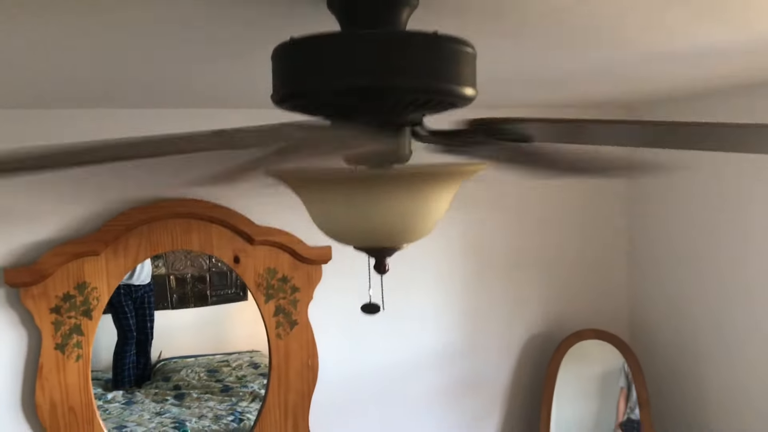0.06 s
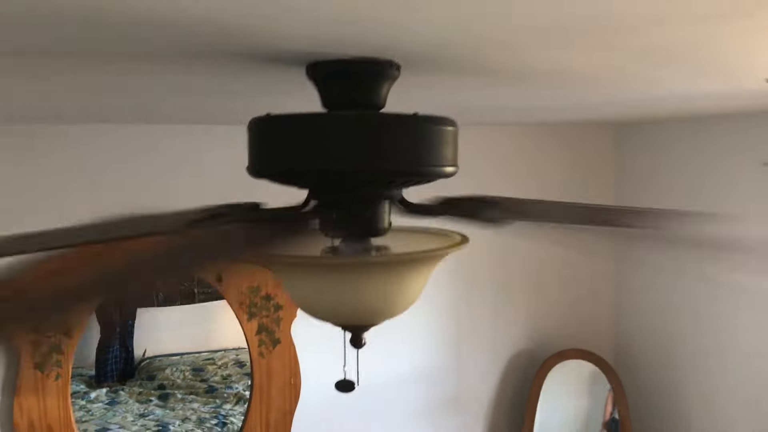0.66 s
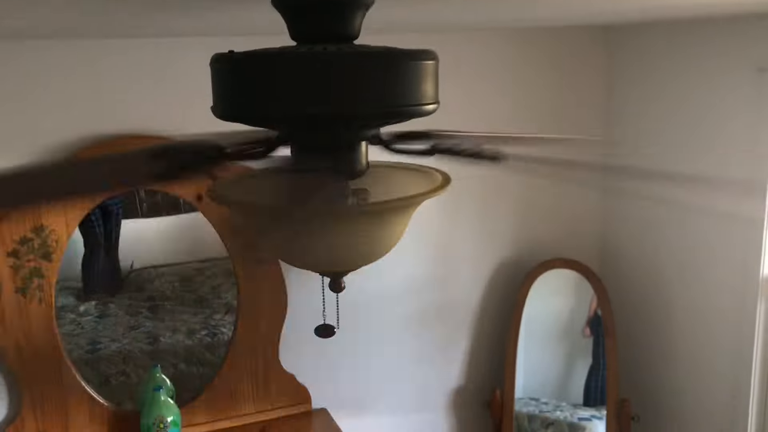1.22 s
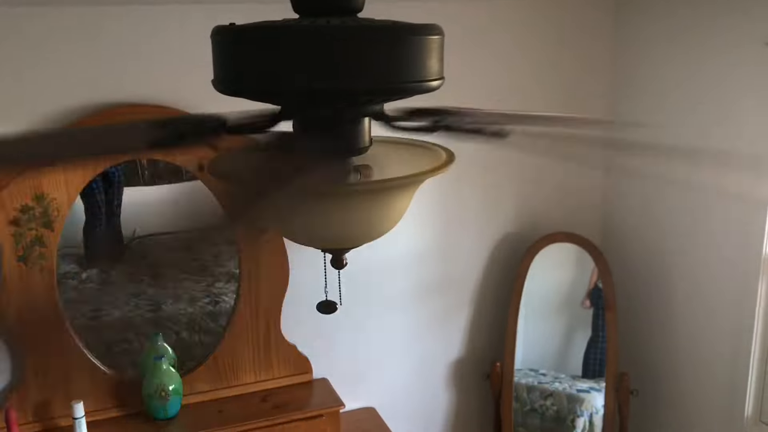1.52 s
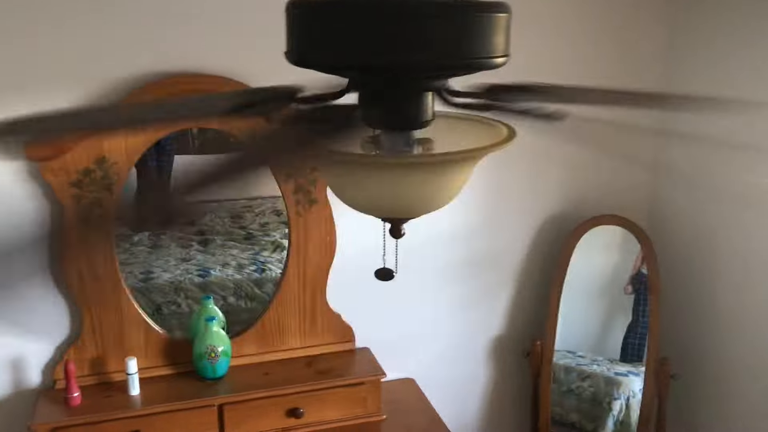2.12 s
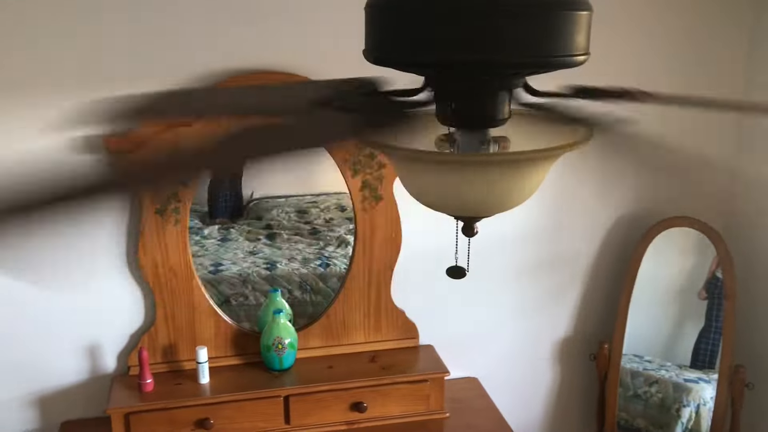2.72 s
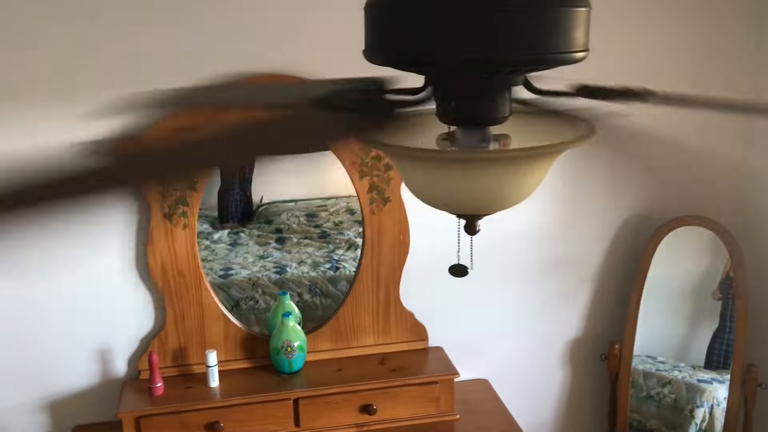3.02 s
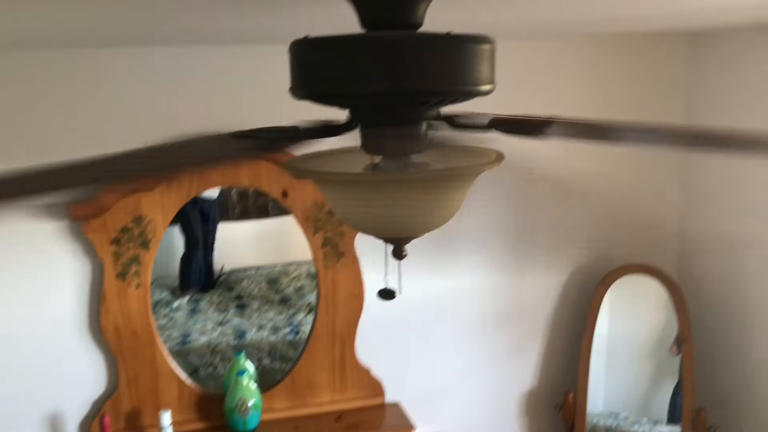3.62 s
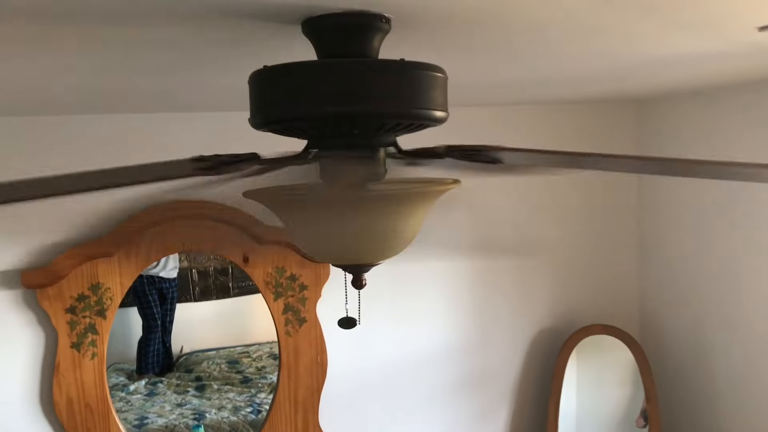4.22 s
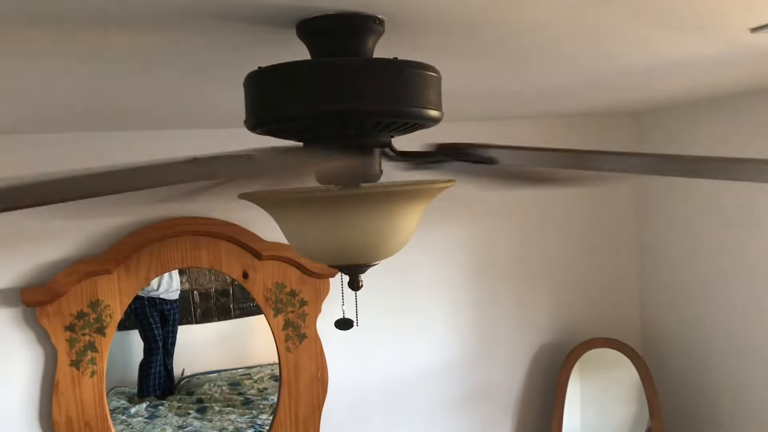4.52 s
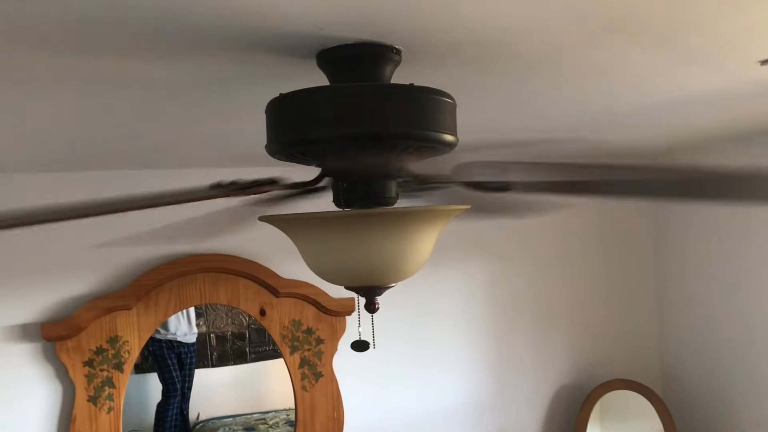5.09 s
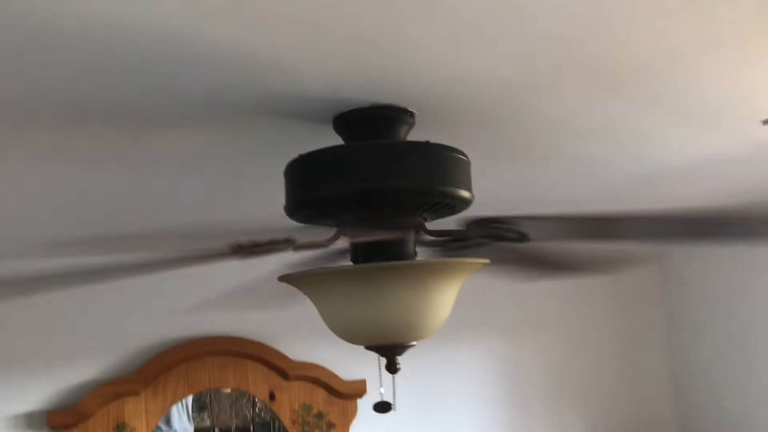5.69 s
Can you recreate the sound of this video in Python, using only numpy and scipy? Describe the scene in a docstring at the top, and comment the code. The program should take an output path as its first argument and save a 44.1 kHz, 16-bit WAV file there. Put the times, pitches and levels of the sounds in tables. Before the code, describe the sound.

Six loud, unevenly spaced knocks on wood stand out over the quiet, throbbing hum and airy whoosh of a ceiling fan in a small room. The first two and the last are more of a clack, the middle three are duller thumps. Light rubbing and a few pull chain ticks come mostly in the second half. The handheld microphone moves nearer, then away, adding faint hiss.

```python
"""A small bedroom with a ceiling fan: the motor's mains hum swells once a turn over the soft, turbulent
rush of the blades. Six dull knocks set wood in damped vibration, reflect from the near walls and excite
the room's modes. Between them fall light friction scuffs and the ticks of the pull chains.
A phone, drifting toward the fan and away again, adds its own hiss and a thin whine."""
import sys
import numpy as np
from scipy import signal
from scipy.fft import rfft, irfft
from scipy.io import wavfile
from scipy.ndimage import uniform_filter1d

SR = 44100
rng = np.random.default_rng(int(sys.argv[2]) if len(sys.argv) > 2 else 0)


def persist_wave(psi):
    """Save psi, clipped to +-1, as 16-bit WAV."""
    counts = np.round(np.clip(psi, -1, 1) * 32767).astype(np.int16)
    wavfile.write(sys.argv[1], SR, np.atleast_2d(counts).T)


N = 253575
TIME = np.arange(N) / SR


def undb(db):
    """Amplitude ratio of a level in decibels."""
    return 10 ** (np.asarray(db) / 20)


def unit(x):
    """Normalisation to rms 1."""
    return x / np.sqrt(np.mean(x ** 2))


def along(points, hz, column=1):
    """Interpolation of a spectrum table on a log-frequency axis."""
    points = np.array(points, float)
    return np.interp(np.log(np.maximum(hz, 1)), np.log(points[:, 0]), points[:, column])


def shaped(x, gain):
    """Linear filtering: the spectrum is multiplied by gain(frequency)."""
    return irfft(rfft(x) * gain(np.fft.rfftfreq(len(x), 1 / SR)), len(x))


def noise(gain, size=N):
    """White noise coloured by gain(frequency), rms 1."""
    return unit(shaped(rng.standard_normal(size), gain))


def bands(x):
    """Filter bank of overlapping bands half an octave apart; yields (centre [Hz], band)."""
    spectrum, f = rfft(x), np.maximum(np.fft.rfftfreq(len(x), 1 / SR), 1)
    for hz in 22 * 2 ** (np.arange(20) / 2):
        yield hz, irfft(spectrum * np.maximum(0, 1 - 2 * abs(np.log2(f / hz))), len(x))


def resonance(hz, half_width_hz, size=N):
    """Random excitation of one resonance, rms 1."""
    return noise(lambda f: 1 / (1 + ((f - hz) / half_width_hz) ** 2), size)


def ringing(resonances, size):
    """Superposition of randomly excited resonances, rms 1."""
    return unit(sum(undb(db) * resonance(hz, width, size) for hz, width, db in resonances))


def wander(rate_hz):
    """Random modulation: held values smoothed twice, rms 1."""
    hold = max(2, int(SR / rate_hz))
    steps = np.repeat(rng.standard_normal(N // hold + 1), hold)
    return unit(uniform_filter1d(uniform_filter1d(steps, hold), hold)[:N])


def fade(t, t60):
    """Exponential decay by 60 dB in t60."""
    return np.exp(-np.log(1000) * t / t60)


def add(out, start_s, x):
    """Superposition of x on out from start_s."""
    i = max(0, int(start_s * SR))
    out[i:i + len(x)] += x[:max(0, N - i)]


# microphone self-noise: (frequency [Hz], relative spectral level [dB])
HISS_SPECTRUM = [(1500, 0), (3000, 0.5), (4300, 0), (6500, -4.5), (9500, -5.5), (10800, -9), (13000, -3),
                 (14800, 3.5), (16000, -15)]
# tones of the whine: (frequency [Hz], level [dB], rms frequency deviation [Hz])
WHINE_TONES = [(7340, -85.5, 60.4), (10200, -95, 15)]


def electronics(first_chirp_s=0.804, period_s=1.277, chirp_s=0.0087, pause_s=0.045):
    """Self-noise of the phone: hiss and a frequency-modulated whine that breaks off regularly to chirp."""
    hiss = undb(-72) * noise(lambda f: undb(along(HISS_SPECTRUM, f)))
    whine = np.zeros(N)
    for hz, db, deviation_hz in WHINE_TONES:
        phase = 2 * np.pi * np.cumsum(hz + deviation_hz * wander(200)) / SR
        whine += undb(db) * np.sqrt(2) * np.sin(phase)
    from_chirp = (TIME - first_chirp_s + period_s / 2) % period_s - period_s / 2
    running = 1 - np.exp(-(from_chirp / pause_s) ** 2)
    chirps = undb(-74.5) * np.exp(-(from_chirp / chirp_s) ** 2) * resonance(9940, 130)
    return hiss + running * whine + chirps


def spreading_db(closest_s=2.12, closest_m=1.09, drift_m_s=0.37):
    """Inverse-distance law: the fan's level at the drifting phone, 0 dB at the closest point."""
    distance_m = np.hypot(closest_m, drift_m_s * (TIME - closest_s))
    return -20 * np.log10(distance_m / closest_m)


# air stirred by the blades: (frequency [Hz], relative spectral level [dB])
AIR_SPECTRUM = [(28, -19), (40, -6.5), (57, 1), (90, -1.5), (138, 1), (170, -10), (240, -3.5), (360, -5.5),
                (480, -13.5), (680, -19.5), (950, -21.5), (1350, -29.5), (3000, -40), (7000, -53.5)]


def fan(hum_hz=120, turn_s=0.367, swell_at_s=1.04, swell_depth=0.63, flicker_db=0.8):
    """Amplitude modulation: hum at twice the mains frequency swells once a turn over blade turbulence."""
    near_db = spreading_db()
    turn = np.cos(2 * np.pi * (TIME - swell_at_s) / turn_s)
    tone = np.sqrt(2) * (1 + swell_depth * turn) * np.sin(2 * np.pi * hum_hz * TIME)
    waver = 0.35 * resonance(hum_hz, 7.1)
    hum = undb(-50.5 + 2.33 * near_db) * (tone + waver)  # falls off faster than the rush of air
    drone = undb(-60 + near_db) * resonance(79, 1.8)  # a standing wave of the room, fed by the blades
    rush = noise(lambda f: undb(along(AIR_SPECTRUM, f)))
    air = unit(sum(band * undb(flicker_db * wander(9.8)) for _, band in bands(rush)))
    return hum + drone + air * undb(-48.5 + near_db + 0.03 * turn)


# contacts of the pull chains: (time [s], level [dB], frequency [Hz])
CHAIN_TICKS = [(4.0196, -57.5, 5230), (4.028, -59, 4650), (4.0356, -53.5, 4600), (4.104, -60, 4770),
               (4.7883, -55.5, 4570)]


def chain_ticks(rise_s=0.00053, grit=0.74, room_db=-26, room_t60=0.36):
    """Impact of small beads: a few bright cycles, then a trace of reverberation."""
    t, out = TIME[:SR // 4], np.zeros(N)
    pulse = t / rise_s * np.exp(1 - t / rise_s)
    for peak_s, db, hz in CHAIN_TICKS:
        ring = resonance(hz, 1200, len(t))
        touch = pulse * (np.sin(2 * np.pi * hz * t) + grit * ring)
        room = undb(room_db) * fade(t, room_t60) * ring
        add(out, peak_s - rise_s, undb(db) * (touch + room))
    return out


# friction noise: (frequency [Hz], relative spectral level [dB])
FRICTION_SPECTRUM = [(150, -29), (500, 5.5), (1200, 4), (1700, -4), (2300, -3.5), (4200, -12.5),
                     (5400, -13), (7000, -16.5), (9000, -19.5), (15000, -20)]
# resonances of the scuffed surface: (frequency [Hz], half-width [Hz], relative level [dB])
SURFACE_MODES = [(1455, 140, 6), (2140, 190, 2), (3300, 130, -8), (4450, 160, -3.5), (5320, 400, -2.5),
                 (8000, 150, -18), (9200, 400, -13)]
# light rubs: (time [s], level [dB], time before decay [s], treble tilt [dB/octave])
SCUFF_EVENTS = [(0.217, -53.5, 0.018, -4), (0.249, -59.5, 0.011, -0.9), (3.434, -55.5, 0.014, -3.5),
                (3.53, -56, 0.033, 1.8), (4.057, -51.5, 0.0043, -6.5), (4.498, -70.5, 0.53, 0.2),
                (5.245, -56, 0.016, 1.5), (5.458, -63, 0.024, 0.3), (5.593, -58, 0.027, -0.2),
                (5.71, -56.5, 0.018, -15)]


def scuffs(room_t60=0.38, rise_share=0.062, grain_db=1.5):
    """Friction excitation: grainy rubs ring a surface and linger as reverberation."""
    t, out = TIME[:SR], np.zeros(N)
    for start_s, db, length_s, tilt in SCUFF_EVENTS:
        def colour(f):
            return undb(along(FRICTION_SPECTRUM, f) + tilt * np.log2(1 + f / 1000)) * f / (f + 150)
        rub = noise(colour, SR)
        ring_db = min(-4.5 + 5.6 * tilt, -2)  # brighter rubs ring more, up to a limit
        ring = undb(ring_db) * ringing(SURFACE_MODES, SR)
        grain = undb(grain_db * wander(500)[:SR])
        rise = 1 - np.exp(-t / (rise_share * length_s))
        decay = fade(np.maximum(t - length_s, 0), room_t60)
        add(out, start_s, undb(db) * (rub + ring) * grain * rise * decay)
    return out


# diffuse field of the room: (frequency [Hz], relative spectral level [dB], reverberation time [s])
DIFFUSE_FIELD = [(60, -33, .4), (220, -8, 0.79), (374, 3.5, 0.79), (550, 2.5, 0.39), (790, 0.5, 0.47),
                 (1100, -2.5, 0.54), (1580, -17, 0.54), (2070, -8.5, 0.4), (3070, -18.5, 0.41),
                 (5150, -22.5, 0.49), (7800, -26.5, 0.41), (14900, -39, 0.43)]


def reverberation(t, build_s=0.0024, grain_db=4, merge_t60=0.12):
    """Diffuse decay: grainy reflections merge into a wash that lasts longest in the low midrange."""
    grain = undb(grain_db * fade(t, merge_t60) * wander(1500)[:len(t)])
    reflections = rng.standard_normal(len(t)) * grain
    tail = sum(undb(along(DIFFUSE_FIELD, hz)) * fade(t, along(DIFFUSE_FIELD, hz, column=2)) * band
               for hz, band in bands(reflections))
    tail *= 1 - np.exp(-t / build_s)
    return tail / np.std(tail[:SR // 20])


# low modes of the room and its panels: (frequency [Hz], relative level [dB], 60 dB decay time [s])
LOW_MODES = [(66, -20.3, .55), (81, -33, .5), (117, -15.3, .36), (141, .3, .14), (174, -1.9, .18),
             (225, -18, .43), (254.6, -16.7, .33), (309, -30.5, .58), (351, -18, .3), (384, -27, .44),
             (411, -15.8, .24), (480, -20, .2), (533, -28, .45), (581, -29, .3), (678, -20, .24)]


def standing_waves(t, build_s=0.008):
    """Normal modes: after a blow each builds up and decays at its own frequency."""
    modes = sum(undb(db) * fade(t, t60) * np.sin(2 * np.pi * hz * t) for hz, db, t60 in LOW_MODES)
    return (1 - np.exp(-t / build_s)) * modes


# reflections from ceiling and walls: (delay [s], level re direct sound [dB])
EARLY_REFLECTIONS = [(.011, -3.1), (.0182, -2), (.0269, -8.7), (.0401, -11.3)]


def echoed(direct):
    """Specular reflection: delayed, weaker copies add to the direct sound."""
    out = direct.copy()
    for delay_s, db in EARLY_REFLECTIONS:
        lag = int(delay_s * SR)
        out[lag:] += undb(db) * direct[:len(direct) - lag]
    return out


# first crack of the contact: (frequency [Hz], relative spectral level [dB])
CRACK_SPECTRUM = [(200, -19), (600, 7), (1300, -1.5), (3000, -10.5), (7000, -20), (15000, -24)]


def contact_crack(t, rise_s, t60=0.034):
    """Impact transient: broadband noise that dies quickly once the contact force has peaked."""
    grit = noise(lambda f: undb(along(CRACK_SPECTRUM, f)), len(t))
    return undb(-23) * grit * fade(np.maximum(t - rise_s, 0), t60)


# higher resonances of the wood: (frequency [Hz], half-width [Hz], relative level [dB])
CLACK_MODES = [(398, 10, -5), (565, 70, -7), (1090, 180, 7), (1185, 61, 4), (1990, 54, -11),
               (2500, 60, -23), (3180, 120, -9)]


def wood_clack(t, sharp_db, glance, t60=0.29, db_per_octave=9):
    """Selective excitation: contact time picks the resonances, higher ones as the blow glances."""
    centre_hz = 420 * 2 ** (1.9 * glance)
    excited = [(hz, width, db - db_per_octave * abs(np.log2(hz / centre_hz)))
               for hz, width, db in CLACK_MODES]
    return undb(-26 + 0.79 * sharp_db) * ringing(excited, len(t)) * fade(t, t60)


# low resonances of the wood: (frequency [Hz], relative level [dB], time to peak [s])
WOOD_MODES = [(153, -5.7, .0088), (200, -2.5, .0085), (360, -8.8, .005), (610, -17.6, .0032)]


def wood_thump(t, glance):
    """Heavily damped vibration: a few cycles, weaker in the upper modes when the blow glances."""
    tilt, lowest_hz = 0.17 - 3 * glance, WOOD_MODES[0][0]  # tilt in dB/octave
    out = np.zeros(len(t))
    for hz, db, peak_s in WOOD_MODES:
        pulse = (t / peak_s * np.exp(1 - t / peak_s)) ** 3
        out += undb(db + tilt * np.log2(hz / lowest_hz)) * pulse * np.sin(2 * np.pi * hz * t)
    return out


# blows on the wood: (time [s], level [dB], sharpness [dB], glance [0 square, about 1 glancing])
BLOWS = [(0.0237, -19.5, -0.5, 1.14), (0.408, -18, 1, 0.9), (1.2327, -17, -6, .05),
         (3.1295, -17.5, -6, .03), (3.5666, -19, -5, .12), (5.304, -19, 3.5, 0.54)]


def knocks(rise_s=0.0035, tail_db=-26.5, shelf_hz=700):
    """Impulse response: blows on one spot drive the same modes; force, sharpness and angle vary."""
    t, out = TIME[:SR * 2 // 3], np.zeros(N)
    standing = standing_waves(t)
    contact = np.minimum(t / rise_s, 1) ** 3  # the contact force takes a moment to peak
    for start_s, db, sharp_db, glance in BLOWS:
        thump = echoed(wood_thump(t, glance))
        crack = echoed(contact * contact_crack(t, rise_s))
        clack = contact * wood_clack(t, sharp_db, glance)
        tail = undb(tail_db) * reverberation(t)
        treble = undb(0.52 * sharp_db)  # a sharper contact puts more treble into the room
        bright = shaped(crack + tail, lambda f: 1 + (treble - 1) * f ** 2 / (f ** 2 + shelf_hz ** 2))
        add(out, start_s, undb(db) * (thump + standing + clack + bright))
    return out


def scene():
    """Superposition of all sources at one microphone."""
    return (fan() + knocks() + scuffs() + chain_ticks() + electronics())[None]


def record(dry, low_hz=25, top_hz=15700):
    """Band limiting: the phone drops the deepest bass and the highest treble."""
    highpass = signal.butter(2, low_hz, "high", fs=SR, output="sos")
    lowpass = signal.ellip(12, .1, 80, top_hz, fs=SR, output="sos")
    return signal.sosfilt(lowpass, signal.sosfilt(highpass, dry))


dry = scene()
out = record(dry)
persist_wave(out)
```